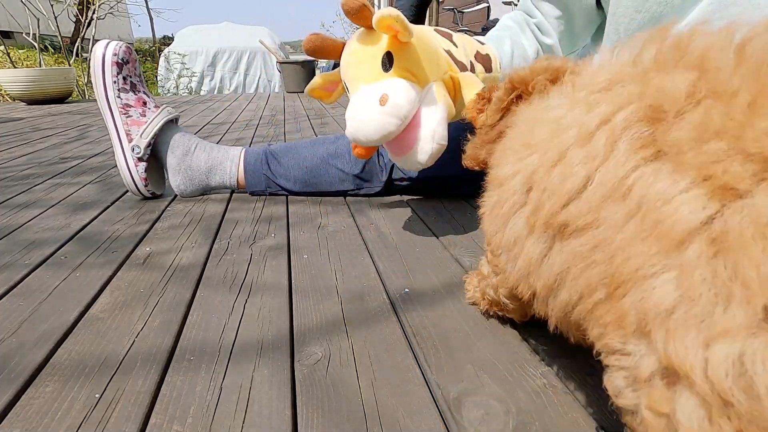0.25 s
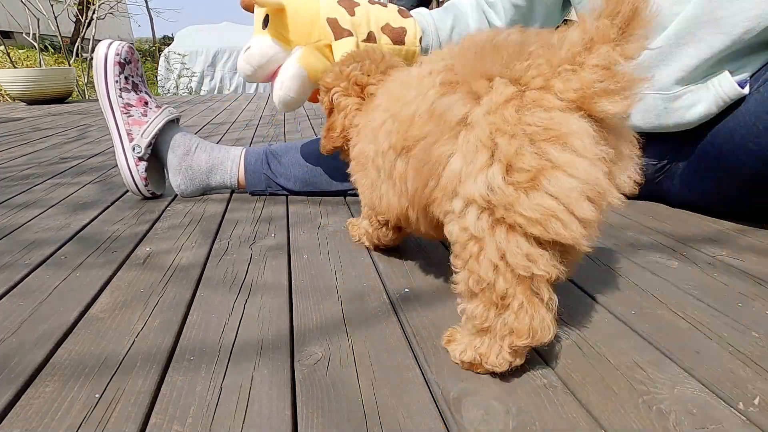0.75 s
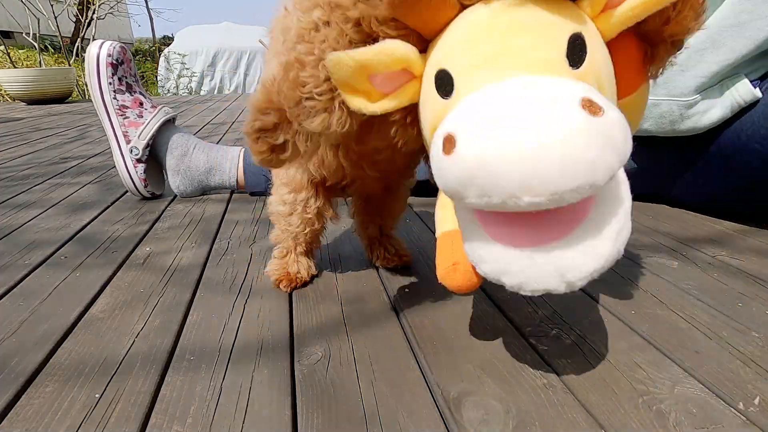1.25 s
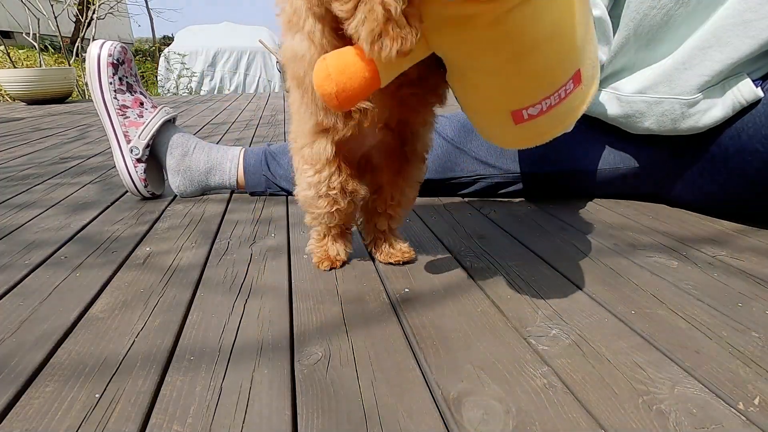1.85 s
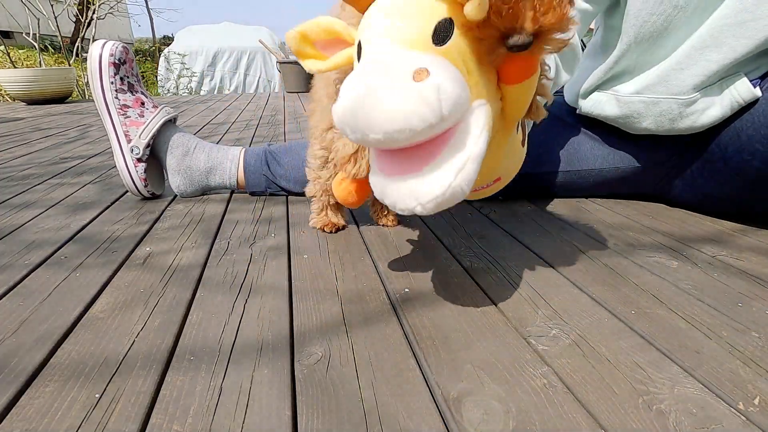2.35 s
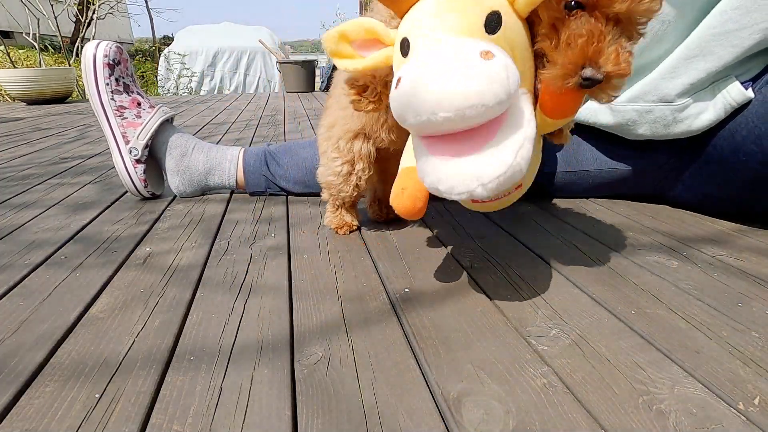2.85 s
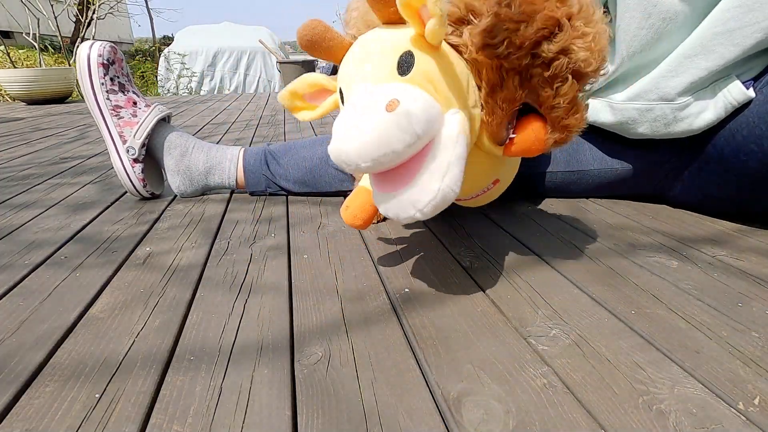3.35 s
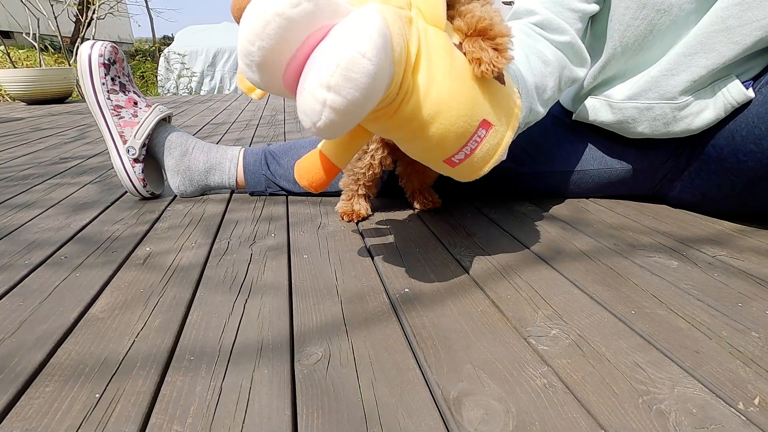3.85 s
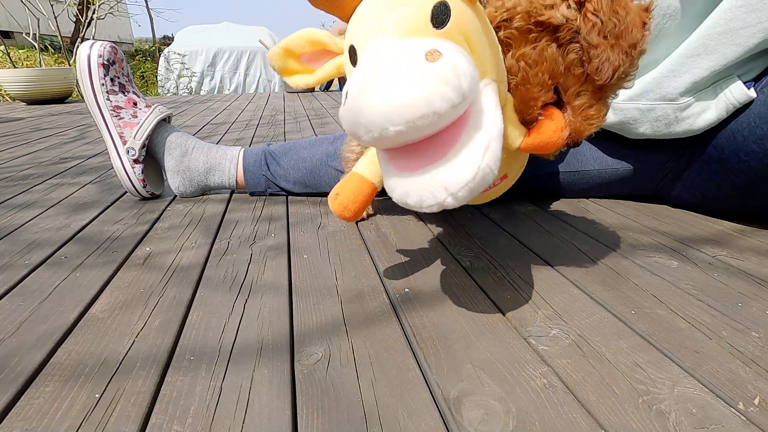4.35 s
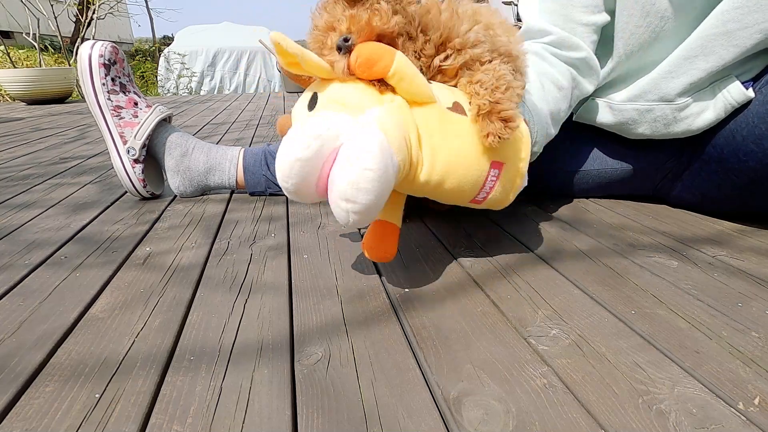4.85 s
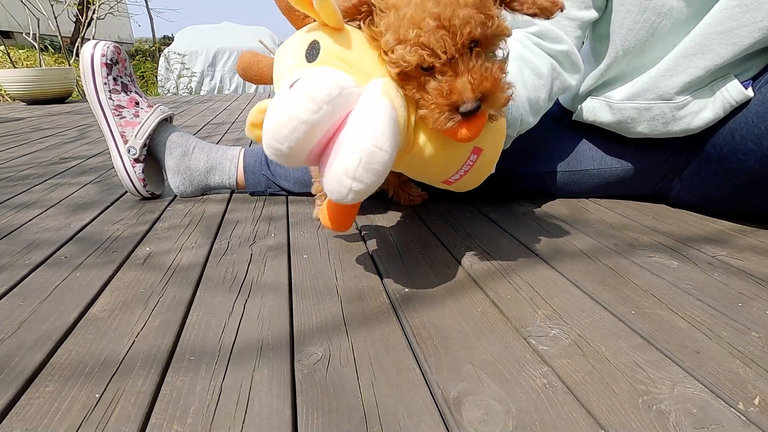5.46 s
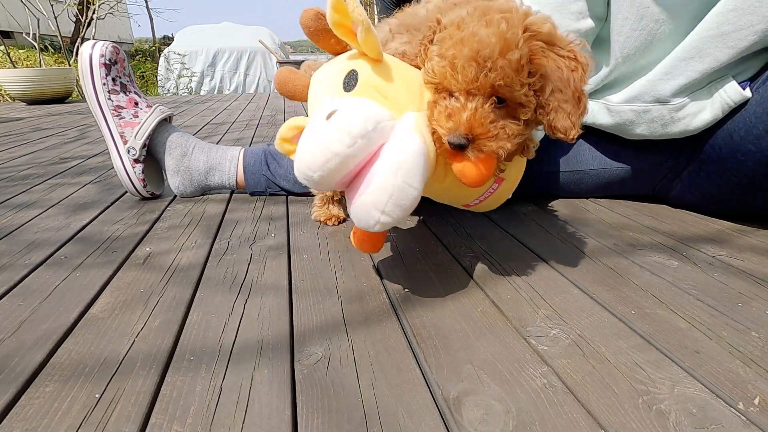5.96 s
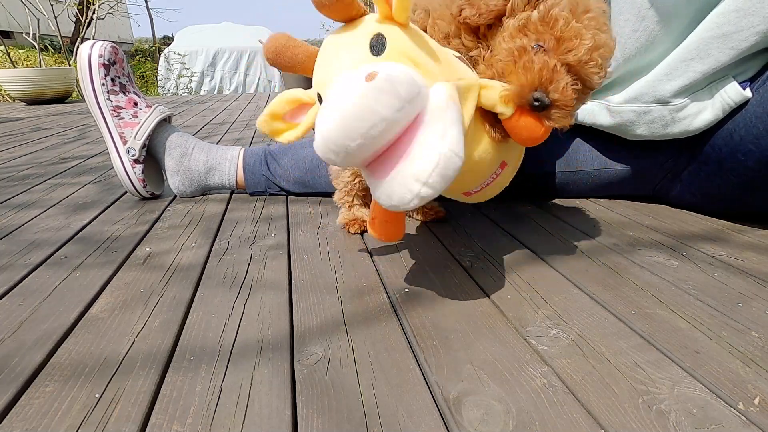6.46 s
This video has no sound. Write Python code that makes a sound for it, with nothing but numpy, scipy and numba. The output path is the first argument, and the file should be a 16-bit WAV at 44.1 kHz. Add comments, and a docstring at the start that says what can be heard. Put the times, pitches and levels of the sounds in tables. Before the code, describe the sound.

A puppy tussles with a plush toy outdoors, with rustling, small clicks and a few short squeaks over low wind.

```python
"""Scuffing fur, ticking claws and short squeaks over a rumble of wind: a puppy wrestles a plush hand puppet
on a wooden deck outdoors, close to a small microphone. Fibres slip in grains of noise, the puppet's reed
squeaker chirps when squeezed, and a paw knocks a board into ringing. Far traffic washes behind it all.
The recorder's gain control sinks after each loud squeak and slowly comes back."""
import sys
import numpy as np
from scipy import signal
from scipy.fft import rfft, irfft
from scipy.io import wavfile
from scipy.ndimage import uniform_filter1d
from numba import njit

SR = 44100
rng = np.random.default_rng(int(sys.argv[2]) if len(sys.argv) > 2 else 0)


def output_pcm(signal):
    """Save a mono or channel-first signal as 16-bit PCM at the path in sys.argv[1].

    Samples are clipped to [-1, 1] before scaling.
    """
    pcm = np.clip(np.atleast_2d(signal).T, -1, 1) * 32767
    wavfile.write(sys.argv[1], SR, np.round(pcm).astype(np.int16))


N = 296352
T = np.arange(N) / SR

# Dull band of scuffs, ticks and the squeaker's puff: f/Hz, level/dB
DULL = [(800, -2.5), (2300, 2), (4000, -1.5), (5500, -18)]
# Bright band of fur and ticks: f/Hz, level/dB
BRIGHT = [(3500, -15), (5500, -2.5), (7800, 0.5), (10000, -1.5), (12500, -10), (16000, -15.5)]
# Tunable sheen of strokes and hissing air: f/centre frequency, level/dB
SHEEN = [(.45, -17.5), (.8, -5), (1.0, -5), (1.25, -7), (2.1, -25)]


def amp(db):
    return 10 ** (np.asarray(db) / 20)


def rms_one(x):
    return x / np.sqrt(np.mean(x ** 2) + 1e-20)


def coloured(x, points):
    """Equalises x along a curve of f/Hz, level/dB points."""
    hz, db = np.transpose(points)
    grid = np.maximum(np.fft.rfftfreq(len(x), 1 / SR), 1)
    return irfft(rfft(x) * amp(np.interp(np.log(grid), np.log(hz), db, -90, -90)), len(x))


def noise(colour):
    """Coloured noise at unit RMS."""
    return rms_one(coloured(rng.standard_normal(N), colour))


def drift(rate_hz):
    """A slow random wander at unit RMS."""
    r = np.exp(-2 * np.pi * rate_hz / SR)
    return rms_one(signal.lfilter([1], [1, -2 * r, r * r], rng.standard_normal(N + SR))[SR:])


def swell(peak_s, length_s, t=T):
    """A smooth rise and a slower fall."""
    late = (t - peak_s) / length_s
    return np.exp(-.5 * np.abs(late / np.where(late < 0, .3, .48)) ** 1.63)


def rise(x):
    """A soft step from 0 to 1 around x = 0."""
    return .5 + .5 * np.tanh(x / 2)


def wind():
    """Wind buffets the microphone, with one brighter rush of air."""
    # Strength of the gusts: t/s, level/dB
    gusts = [(0, -24.5), (.6, -22), (.9, -24), (1.3, -26), (1.6, -26), (2, -30.5), (2.5, -25.5), (3.4, -23),
             (4, -26), (4.3, -23.5), (4.6, -28.5), (4.9, -25), (5.8, -26), (6.72, -26.5)]
    # Spectrum of the buffeting: f/Hz, level/dB
    rumble_colour = [(7.1, 19.5), (12, 2.5), (37, 1.5), (70, -7), (187, -15), (260, -21), (328, -19.5),
                     (500, -30.5), (650, -55), (1100, -120)]
    # Spectrum of the rush: f/Hz, level/dB
    rush_colour = [(90, -3), (170, 2), (900, -21), (2500, -28)]
    rumble = noise(rumble_colour) * amp(np.interp(T, *np.transpose(gusts)) + 1.5 * drift(5.5))
    rush = noise(rush_colour) * amp(-27) * swell(peak_s=1.27, length_s=0.17)
    return rumble + rush


def distance():
    """A steady wash of far traffic and air, in which a faint tone swells once."""
    # Spectrum of the wash: f/Hz, level/dB
    wash_colour = [(88, -23), (150, -4), (555, -8.5), (662, -10), (1360, -15), (2550, -24.5), (5680, -29),
                   (10000, -26.5), (15100, -34), (16000, -36.5)]
    wash = noise(wash_colour) * amp(-41 + .8 * drift(3))
    hum_hz = 484
    hum = amp(-46 + 2 * drift(8)) * swell(peak_s=1.65, length_s=1.1) * np.sin(2 * np.pi * hum_hz * T)
    return wash + hum


def rubbing():
    """Fibres slip in dense uneven grains; each stroke is part dull, part bright and bounces off the deck."""
    # Restless fur between the strokes: t/s, level/dB
    fidget = [(0, -53.5), (1.1, -54), (1.7, -56.5), (2.1, -57), (3, -46), (3.5, -54.5), (4, -56.5),
              (4.6, -54), (6.72, -58)]
    # Strokes of fur, cloth and claws: peak t/s, length/s, dull level/dB, bright level/dB, sheen f/Hz
    scuffs = [(0.112, 0.014, -40, -33, 8200), (0.123, 0.0016, -27, -15.5, 10000),
              (0.288, 0.019, -36, -25.5, 8400), (0.513, 0.015, -44, -42, 8500),
              (0.535, 0.009, -39.5, -28, 7980), (0.682, 0.026, -39, -35.5, 7700),
              (0.715, 0.0027, -30, -23.5, 8700), (0.828, 0.021, -35.5, -38, 7540),
              (1.14, 0.025, -36.5, -31.5, 7800), (1.227, 0.057, -43, -43.5, 8100),
              (1.713, 0.025, -64, -37.5, 8650), (1.997, 0.12, -70, -43, 9000),
              (2.276, 0.05, -54, -38, 9800), (2.445, 0.047, -38.5, -33, 8400),
              (2.516, 0.038, -40, -41, 8100), (2.618, 0.031, -39, -35, 8370),
              (3.049, 0.0059, -32.5, -36.5, 6200), (3.14, 0.048, -63, -41, 8250),
              (3.219, 0.016, -46, -35, 7600), (3.44, 0.067, -47, -34, 8500),
              (3.488, 0.17, -40.5, -85, 7700), (3.592, 0.022, -29.5, -26.5, 7950),
              (3.887, 0.038, -37, -40, 8750), (4.083, 0.028, -66, -40, 9300), (4.292, 0.03, -67, -44, 8000),
              (4.506, 0.056, -47, -40, 8150), (4.634, 0.021, -35.5, -32, 8200),
              (4.726, 0.031, -38.5, -37.5, 7940), (4.831, 0.038, -37, -35, 9650),
              (4.926, 0.05, -53, -43, 9000), (5.079, 0.045, -41, -44.5, 8700),
              (5.132, 0.05, -55, -43, 9150), (5.308, 0.047, -43.5, -46, 8700),
              (5.416, 0.021, -43.5, -38, 7500), (5.512, 0.041, -59, -40, 9000),
              (6.177, 0.041, -36, -33.5, 7600), (6.222, 0.0082, -42, -36, 5600),
              (6.35, 0.03, -39.5, -51, 5400), (6.368, 0.014, -25, -27, 5700),
              (6.443, 0.012, -33, -35, 8300), (6.659, 0.011, -41.5, -40, 8960)]
    grains = rng.standard_normal((2, N)) * amp(3.9 * np.minimum(rng.exponential(1, N), 5) + 2.6 * drift(90))
    snags = 28 * rng.standard_normal(N) * (rng.random(N) < 14 / SR)   # a fibre catches and lets go
    restless = amp(np.interp(T, *np.transpose(fidget)) + 2.8 * drift(12))
    fur = 1.03 * rms_one(coloured(grains[0], DULL)) + rms_one(coloured(grains[1] + snags, BRIGHT))
    out = restless * fur
    for s, length_s, dull_db, bright_db, hz in scuffs:
        on = slice(max(round(s * SR) - 4096, 0), round(s * SR) + 4096)
        dull = rms_one(coloured(grains[1, on], DULL))
        bright = rms_one(coloured(grains[0, on], np.multiply(SHEEN, [hz, 1])))
        stroke = swell(s, length_s, T[on]) * (amp(dull_db) * dull + amp(bright_db) * bright)
        bounce_s = rng.uniform(.0003, .0011)
        out[on] += stroke + .35 * np.roll(stroke, round(bounce_s * SR))
    return out


def ticks():
    """Claws, teeth and cloth snaps: each a burst of noise dying within milliseconds."""
    # Ticks: t/s, dull peak/dB, bright peak/dB
    clicks = [(0.223, -23.5, -20.5), (0.3648, -27.5, -22), (0.6988, -60, -41.5), (0.7263, -28, -17.5),
              (0.8172, -20.5, -18.5), (0.917, -28, -16), (1.2067, -20, -9.5), (1.949, -26, -16.5),
              (2.133, -27, -20), (2.706, -17, -16.5), (3.0716, -44, -29), (3.1419, -19.5, -7),
              (3.321, -26.5, -24), (3.349, -20.5, -24.5), (4.7196, -38.5, -12), (4.8161, -26, -10.5),
              (4.9903, -25.5, -41), (5.2124, -40, -23), (5.3886, -41, -24.5), (5.493, -26.5, -23),
              (5.634, -23, -30), (5.652, -29, -26), (5.7254, -28.5, -22.5), (5.7308, -29, -28),
              (6.1048, -24.5, -22.5), (6.1455, -22, -21), (6.1525, -22, -23), (6.4415, -22.5, -16.5)]
    out, size = np.zeros(N), 512
    decay = np.exp(-T[:size] / 0.00058) + amp(-14.5) * np.exp(-T[:size] / 0.0042)
    for s, dull_db, bright_db in clicks:
        burst = rng.standard_normal(size) * decay
        at = round(s * SR) - 20
        for db, colour in ((dull_db, DULL), (bright_db, BRIGHT)):
            part = np.roll(coloured(np.roll(burst, 40), colour), -20)
            out[at:at + size] += amp(db) * part / np.abs(part).max()
    return out


def squeaker():
    """A whistle slides down until the reed catches; the pitch then sags ever faster as the bulb empties."""
    # Squeezes: catch t/s, length/s, reed f/Hz, sag/Hz, catch time/s, build time/s, fundamental level/dB,
    # overtone level/dB; then the shading by plush and paws: dip f/Hz, dip gain/dB, odd lift/dB, octave lift/dB
    squeaks = [(1.4545, 0.044, 1069, 101, 0.00074, 0.0014, -29, -15, 5230, -6, -0.5, 0.5),
               (2.558, 0.04, 1046, 110, 0.00041, 0.0017, -19.5, -21, 6440, -1, 3, -2.5),
               (3.433, 0.01, 985, 6.1, 0.0023, 0.0016, -16, -22, 6900, -29, -4, 3.5),
               (3.652, 0.04, 1096, 127, 0.00038, 0.0021, -22.5, -18.5, 3840, -10, 5, 6),
               (4.099, 0.016, 980, 20, 0.00093, 0.0093, -17, -11, 3770, -7, -2.7, -0.2),
               (4.311, 0.032, 1064, 97, 0.0003, 0.0027, -18, -13, 3550, -25, 4.5, 4.3)]
    # The reed's overtones, from harmonic 2 up: level/dB
    reed = [2, -8, -7.5, -9, -8.5, -3.5, -6.5, -8.5, -13, -19, -30, -32, -29]
    whistle_hz, scoop_hz, scoop_s = 1370, 39.3, 0.0024
    fade_db_per_s, octave_fade_db_per_s, ring_on_s = 38.5, 76.5, 0.0064
    out, effort = np.zeros(N), np.zeros(N)
    flutter_db = 3.5 * drift(49)
    for (s, length_s, hz, sag_hz, catch_s, build_s, fundamental_db, overtone_db,
         dip_hz, dip_db, odd_db, octave_db) in squeaks:
        on = slice(round(s * SR) - 2048, round(s * SR) + 4096)
        t = T[on] - s
        caught = t / catch_s
        release_s = 0.00027 + 0.98 * catch_s   # a soft squeeze also lets go softly
        sag = sag_hz * np.clip(t / length_s, 0, 1.2) ** 1.7
        scoop = scoop_hz * np.exp(-np.abs(t) / scoop_s)   # the reed starts a little flat
        pitch = hz - sag - scoop + (whistle_hz - hz) * rise(-caught)
        phase = 2 * np.pi * np.cumsum(pitch) / SR

        overtones = np.zeros(len(t))
        for k, db in enumerate(reed, 2):
            lift = odd_db * (k % 2) + (octave_db - octave_fade_db_per_s * t) * (k == 2)
            dip = dip_db * np.exp(-np.log(k * pitch / dip_hz) ** 2 / 0.022)
            flutter = np.roll(flutter_db, 3001 * k)[on]   # each overtone wavers on its own
            onset = rise(2 * caught - 0.6 * (k - 4))   # higher ones speak later
            overtones += amp(db + lift + dip + flutter) * onset * np.cos(k * phase - 0.14 * k * k)
        gate = rise(caught) * rise((length_s - t) / release_s) ** 2
        build = 1 - 0.51 * np.exp(-np.maximum(t, 0) / build_s)
        effort[on] = amp(overtone_db - fade_db_per_s * t) * gate * build

        # The fundamental whistles in early, yields 3 dB to the reed and rings on after it.
        tone_gate = rise(caught / 4.2 + 1) ** 2 * rise((length_s + ring_on_s - t) / release_s)
        tone_level = amp(fundamental_db - 3 * rise(caught - 2)) * tone_gate
        tone = np.cos(phase) + amp(-11.5) * rise(-caught) * np.cos(2 * phase)
        out[on] -= np.sqrt(2) * (tone_level * tone + effort[on] * overtones)
    return out + escaping_air(effort)


def escaping_air(effort):
    """Hiss past the reed outlasts the tone a little; a rough low puff sounds while pressure builds."""
    linger = np.exp(-1 / (0.0099 * SR))
    flow = signal.lfilter([1 - linger], [1, -linger], effort + 1e-18)
    hiss = amp(-9.5) * flow * noise(np.multiply(SHEEN, [8000, 1]))
    puff = amp(-16) * np.maximum(effort - flow, 0) * noise(DULL)
    return hiss + puff


def whistles():
    """The squeaker only whistles on a light squeeze or as its bulb refills."""
    # Lone whistles: t/s, f/Hz, level/dB, octave level/dB
    peeps = [(1.594, 1080, -32.5, -44), (2.288, 1285, -31, -48), (3.565, 1067, -34.5, -44),
             (3.79, 1100, -36, -37), (3.886, 1290, -38.5, -69), (4.658, 1070, -52, -41)]
    out, length_s = np.zeros(N), 0.017
    for s, hz, db, octave_db in peeps:
        on = np.abs(T - s) < 2 * length_s
        phase = 2 * np.pi * hz * T[on]
        tone = amp(db) * np.sin(phase) + amp(octave_db) * np.sin(2 * phase)
        out[on] += np.sqrt(2) * swell(s, length_s, T[on]) * tone
    return out


def knocks():
    """A paw's blows ring the modes of a deck board."""
    # Paw blows: t/s, level/dB
    paws = [(2.348, -22), (2.365, -19)]
    # Board modes: f/Hz, level/dB, T60/s
    board = [(460, -5, 0.028), (1360, 13.5, 0.0022), (1940, -20, 0.012), (3580, -15.5, 0.015)]
    out = np.zeros(N)
    for hz, mode_db, t60 in board:
        blows = np.full(N, 1e-18)
        for s, db in paws:
            blows[round(s * SR)] = amp(db + mode_db)
        r, w = amp(-60 / (t60 * SR)), 2 * np.pi * hz / SR
        out += signal.lfilter([0, np.sin(w)], [1, -2 * r * np.cos(w), r * r], blows)
    return out


def yard(x):
    """A thin scattered tail from walls and planters, duller than the source."""
    wet_db, t60_s, cut_hz = -14, 0.2, 9200
    t = T[:SR // 2]
    tail = amp(wet_db - 60 * t / t60_s) * rng.standard_normal(len(t)) / np.sqrt(t60_s * SR / 14)
    return signal.lfilter(*signal.butter(1, cut_hz, fs=SR), signal.fftconvolve(x, tail)[:N])


def scene():
    """The tussle, its tail and the outdoor bed, in near-mono that widens in the treble."""
    # Side signal relative to mid: f/Hz, level/dB
    width = [(20, -61.5), (500, -46), (4000, -36.5), (9000, -32.5), (16000, -13.5)]
    play = squeaker() + whistles() + rubbing() + ticks() + knocks()
    mid = play + yard(play) + wind() + distance()
    side = coloured(np.roll(mid, 37), width)
    return np.array([mid + side, mid - side])


@njit
def gain_control(level_db, limit_db, pull_per_s, recover_s, deepest_db, glide_s):
    """Gain in dB: pulled down while level plus gain is over the limit, otherwise creeping back."""
    pull, recover, glide = pull_per_s / SR, np.exp(-1 / (recover_s * SR)), 1 / (glide_s * SR)
    wanted, gain, out = 0., 0., np.zeros(len(level_db))
    for i in range(len(level_db)):
        over = level_db[i] + gain - limit_db
        wanted = wanted - pull * over if over > 0 else wanted * recover
        gain += glide * (max(wanted, deepest_db) - gain)
        out[i] = gain
    return out


def record(dry):
    """Gain control keyed above the rumble ducks the mix, the bass less so; then the top is cut."""
    bass_hz, key_hz, ceiling, stop_hz = 110, 600, .48, 16536
    bass = signal.lfilter(*signal.butter(1, bass_hz, fs=SR), dry)
    key = signal.sosfilt(signal.butter(2, key_hz, "high", fs=SR, output="sos"), dry.mean(0))
    level_db = 10 * np.log10(uniform_filter1d(key ** 2, size=221) + 1e-12)
    gain_db = gain_control(level_db, limit_db=-25., pull_per_s=90., recover_s=.35,
                           deepest_db=-21.5, glide_s=.046)
    ducked = amp(0.34 * gain_db) * bass + amp(gain_db) * (dry - bass)
    rounded = ceiling * np.tanh(ducked / ceiling)
    return signal.sosfilt(signal.cheby2(12, 60, stop_hz, fs=SR, output="sos"), rounded)


dry = scene()
out = record(dry)
output_pcm(out)
```